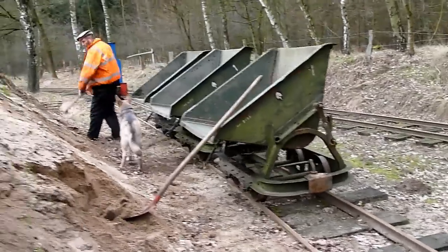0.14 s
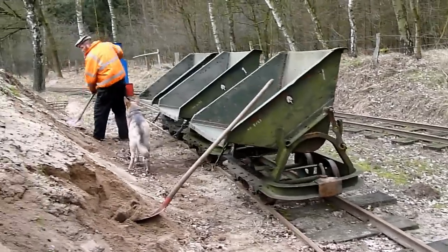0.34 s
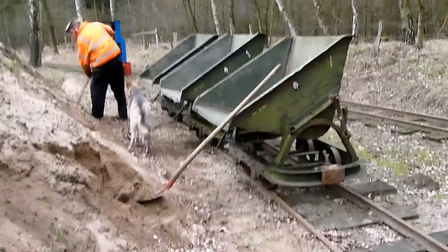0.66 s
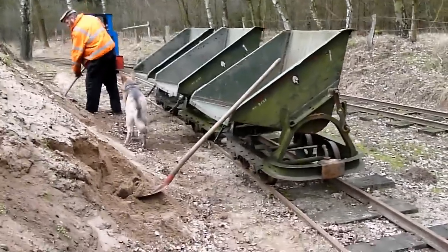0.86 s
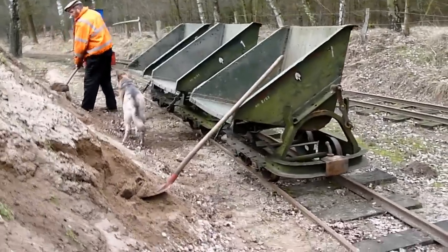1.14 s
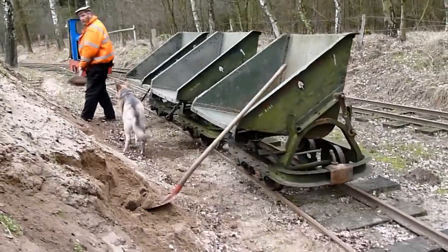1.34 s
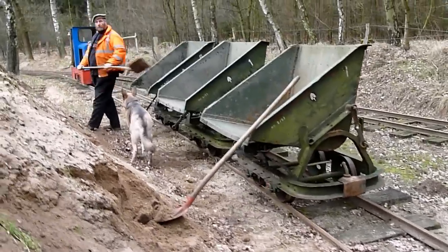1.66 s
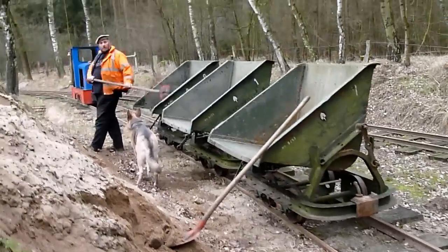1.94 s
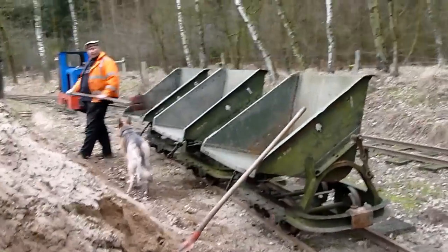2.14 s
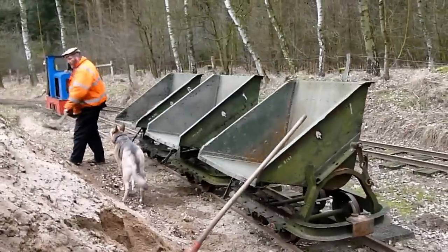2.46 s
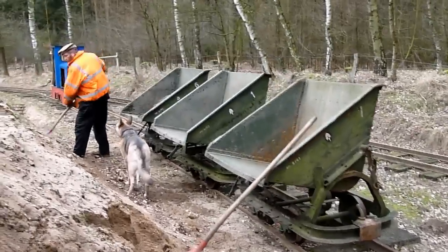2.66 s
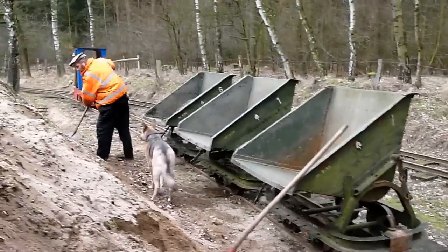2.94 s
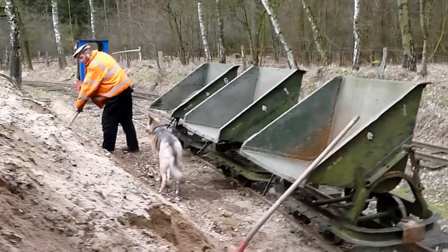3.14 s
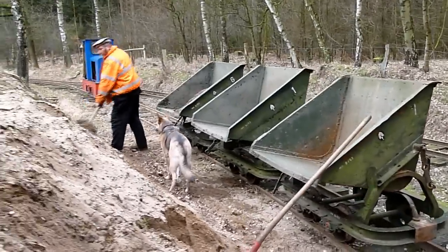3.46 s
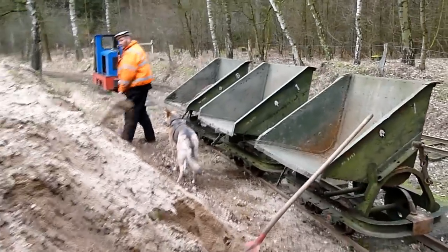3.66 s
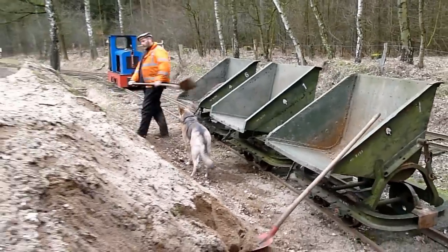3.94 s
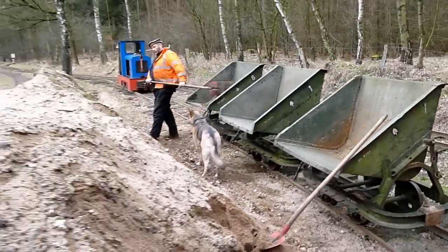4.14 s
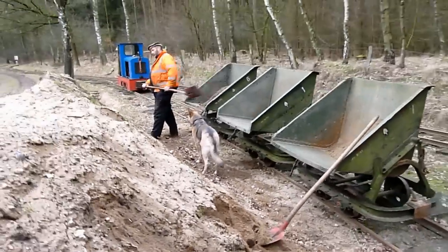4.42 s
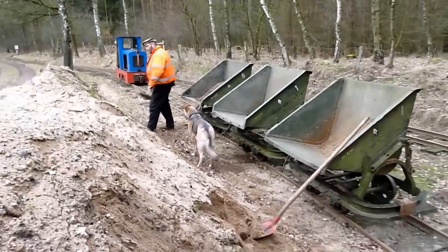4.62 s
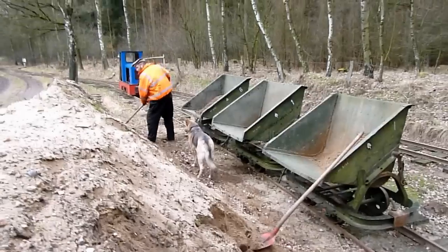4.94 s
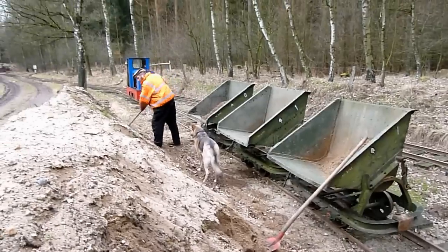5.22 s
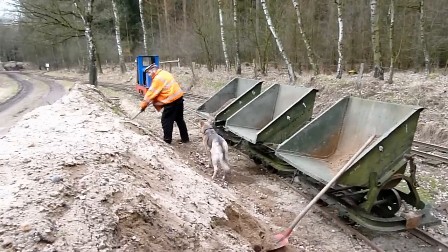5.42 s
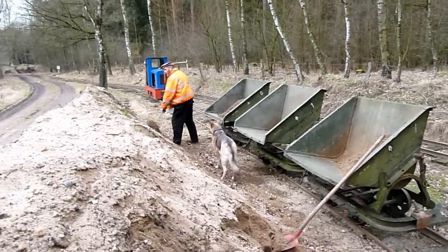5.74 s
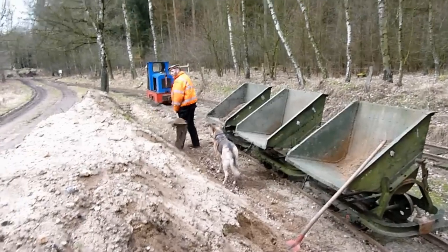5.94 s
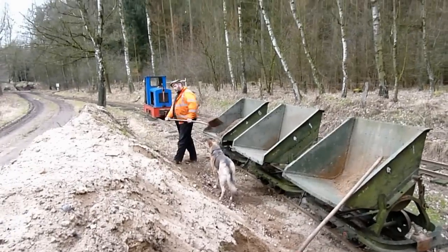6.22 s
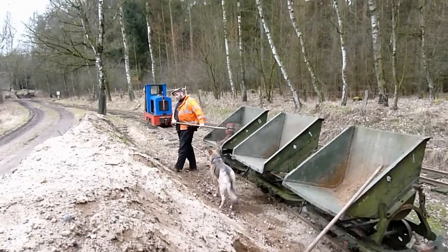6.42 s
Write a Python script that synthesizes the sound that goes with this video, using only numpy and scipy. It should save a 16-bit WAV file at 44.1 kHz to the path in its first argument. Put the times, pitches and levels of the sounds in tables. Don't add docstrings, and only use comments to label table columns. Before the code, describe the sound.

A low, soft wash of wind and far traffic runs throughout, with a faint wavering engine hum in the first 1.7 seconds. Fine sand trickles at about 0.4 s; at 0.7 s a shovel blade stabs the heap with a bright, stony clang and a rush of grit that dies as coarse grains roll on. Soft trickles, pebbles and boot thuds lead to the first load, sliding off and bursting into a steel wagon around 1.9-2.0 s. Boots scuff near 2.9 s, then the hardest stab crunches at 3.1 s. Trickling precedes a louder throw at 4.15 s, with a late shower of grains. From 4.8 to 5.1 s a tool knocks the wagon wall, its plates ringing dully and rattling. A third sharp stab comes at 5.3 s, sand hisses and trickles from 5.9 s, and a last, scrapier throw lands at 6.45 s. Blows echo faintly off trunks and wagons.

```python
import sys
import numpy as np
from scipy import signal
from scipy.io import wavfile
from scipy.ndimage import uniform_filter1d

SR = 44100
rng = np.random.default_rng(int(sys.argv[2]) if len(sys.argv) > 2 else 0)


def unload_audio(sound):
    columns = np.transpose(np.atleast_2d(sound))
    steps = np.round(np.clip(columns, -1, 1) * 32767)
    wavfile.write(sys.argv[1], SR, steps.astype(np.int16))


def volts_from_db(level):
    exponent = np.asarray(level, float) / 20
    return 10 ** exponent


N = 290178
TICKS = np.arange(0, N + 32, 32) / SR


def evened(x):
    return x / np.sqrt(np.mean(x ** 2) + 1e-20)


def read(points, hz):
    f, value = np.transpose(points)
    return np.interp(np.log(hz + 1), np.log(f + 1), value)


def follow(rows):
    s, *columns = np.transpose(rows)
    return [np.interp(np.arange(N) / SR, s, c) for c in columns]


def add(mix, s, sound):
    part = mix[..., round(s * SR):][..., :sound.shape[-1]]
    part += sound[..., :part.shape[-1]]


def play(mix, table, source, *shared):
    for s, *row in table:
        add(mix, s, source(*row, *shared))


def band(x, lo_hz, hi_hz, order=2):
    edges_hz = [lo_hz, min(hi_hz, SR / 2 - 99)]
    return signal.sosfilt(signal.butter(order, edges_hz, "band", fs=SR, output="sos"), x)


def ring(x, hz, width_hz):
    return signal.lfilter(*signal.iirpeak(hz, hz / width_hz, SR), x)


def sides(x, pan_db):
    return np.array([x * volts_from_db(pan_db / 2), x * volts_from_db(-pan_db / 2)])


def grains(per_s, spread_db):
    size = volts_from_db(spread_db * np.minimum(rng.exponential(1, (2, N)), 5))
    size = size * rng.choice([-1, 1], (2, N))
    return size * (rng.random((2, N)) < per_s / SR)


def pitched(count, lo_hz, hi_hz, cycles, per_s, spread_db):
    kind, hits = rng.integers(0, count, (2, N)), grains(per_s, spread_db)
    pitches_hz = np.geomspace(lo_hz, hi_hz, count)
    return sum(ring(hits * (kind == k), hz, hz / cycles) for k, hz in enumerate(pitches_hz))


def lobe(s, db, rise_s, fall_s):
    late = TICKS - s
    return db - 20 * np.where(late < 0, -late / max(rise_s, .002), late / max(fall_s, .002))


def blend(parts):
    columns = np.array([np.broadcast_arrays(TICKS, *p)[1:] for p in parts])
    level_db, *colours = columns.transpose(1, 0, 2)
    power = volts_from_db(level_db) ** 2
    total = power.sum(axis=0)
    mixed = [10 * np.log10(total)] + [(c * power).sum(axis=0) / total for c in colours]
    return [np.interp(np.arange(N) / SR, TICKS, m) for m in mixed]


# freq_hz, density_db_per_hz
WASH = [(18, -38), (30, -3.5), (64, -1), (183, -1), (244, 3), (371, 1.5), (535, 1.5), (1240, -4),
        (1650, -8), (4130, -10.5), (7950, -16.5), (12400, -20), (15700, -22.5)]
WASH_DB = -46.5
# freq_hz, correlation
SAME = [(60, 0.96), (150, 0.87), (380, 0.85), (950, 0.52), (2380, -1.06), (5980, -0.34), (15000, 0.11)]
# time_s, pitch_hz, level_db
HUM = [(0.0, 269, -73), (0.104, 255, -61), (1.088, 258, -62), (1.151, 245, -61.5), (1.206, 271, -93),
       (1.41, 256.4, -57.5), (1.656, 255, -64.5), (1.7, 246.1, -88)]


def wash():
    frames, hz = N // 256 + 5, np.fft.rfftfreq(1024, 1 / SR)
    a, b, c, d, patches = rng.standard_normal((frames, 513, 5)).T
    patches = uniform_filter1d(patches, size=10, axis=0)
    patches = evened(uniform_filter1d(patches, size=14, axis=1))
    same = np.clip(read(SAME, hz), -1 / 4, 1)[:, None]
    left = a + 1j * b
    z = np.array([left, same * left + np.sqrt(1 - same ** 2) * (c + 1j * d)])
    z *= volts_from_db(read(WASH, hz)[:, None] + 1.4 * patches)
    noise = signal.istft(z, nperseg=1024, noverlap=768)[1][:, :N]
    fade = (HUM[-1][0] + .3, HUM[-1][1], -90)
    hum_hz, hum_db = follow([*HUM, fade])
    hum = np.sqrt(2) * volts_from_db(hum_db) * np.sin(2 * np.pi * np.cumsum(hum_hz) / SR)
    return volts_from_db(WASH_DB - 2.5) * evened(noise) + hum


# peak_s, level_db, rise_s_per_20db, fall_s_per_20db
CRUNCHES = [(.356, -56, 0.2, 2.1), (0.719, -49, 0, 0.53), (1.85, -57.5, 2, 0.79),
            (1.977, -46.5, 0.23, 0.16), (2.29, -51.5, 0.5, 0.2), (2.86, -54.5, 0.5, 0),
            (2.975, -55.5, 1.1, -2.5), (3.102, -35.5, 0.05, 0.14), (3.35, -51.5, 0.2, 0),
            (4.15, -34.5, 0.05, -0.05), (4.185, -41, 0.12, -0.03), (4.39, -51.5, 2, -3.5),
            (4.63, -45, 0, -1.06), (5.353, -40.5, 0.1, -0.01), (5.375, -44.5, 0.1, 0.07),
            (6.451, -47, 0.22, 0.5)]
SOIL_DB = -66.5


def heft():
    near, far = pitched(count=8, lo_hz=440, hi_hz=1590, cycles=2.04, per_s=1500, spread_db=2.5)
    level_db = blend([[SOIL_DB]] + [[lobe(*row)] for row in CRUNCHES])[0]
    return volts_from_db(level_db + 0.2) * evened(np.array([near + 0.083 * far, near - 0.42 * far]))


def thud(db, hz, t60_s, click_db):
    t = np.arange(6000) / SR
    turns = hz * (t + 0.00064 * (1 - np.exp(-t / 0.00027)))
    push = -np.sin(2 * np.pi * turns) * volts_from_db(-60 * t / t60_s) * (1 - np.exp(-t * hz * 4.2))
    push = band(push, 78, 1400, order=1)
    click = rng.standard_normal(len(t)) * volts_from_db(-60 * t / 0.015) + 4.1 * (t == 0)
    click = band(click, 640, 3700, order=1)
    return volts_from_db(db) * (push / abs(push).max() + volts_from_db(click_db) * click / abs(click).max())


# start_s, peak_db, pitch_hz, t60_s
PEBBLES = [(1.5495, -35, 1179, 0.0066), (1.554, -35.5, 734, 0.014), (1.836, -36, 810, 0.014),
           (1.972, -33, 737, 0.053), (2.235, -41, 695, 0.022), (2.2525, -33, 540, 0.0098),
           (2.2735, -34, 597, 0.0082), (2.3025, -39, 900, 0.018), (2.8525, -35, 754, 0.0092),
           (2.9773, -23.5, 1130, 0.0041), (2.9778, -36, 760, 0.009), (3.0895, -26.5, 464, 0.007),
           (3.0968, -27, 604, 0.0046), (3.117, -35, 900, .012), (3.344, -41, 420, 0.053),
           (4.6597, -34, 600, 0.011), (5.254, -43.5, 414, 0.082), (5.347, -31.5, 780, 0.034),
           (5.401, -37, 353, 0.017)]
# start_s, peak_db, pitch_hz, t60_s
CLODS = [(.7095, -21, 1197, 0.031), (.71, -26.5, 205, 0.0048), (.712, -23.5, 640, 0.014),
         (1.8025, -34, 240, 0.02), (1.8085, -27, 213, 0.028), (2.59, -45, 203, 0.19),
         (2.8495, -40, 410, 0.091), (2.8525, -31.5, 247, 0.01), (2.978, -29.5, 253, 0.0086),
         (3.098, -41, 95, 0.027), (3.105, -26, 350, 0.046), (3.13, -34.5, 216, 0.048),
         (3.4445, -22, 314, 0.0074), (3.9, -44, 217, 0.13), (4.825, -33.5, 260, 0.021),
         (5.348, -33, 323, 0.0056), (6.452, -36.5, 750, 0.1)]
PEBBLE_CLICK_DB, CLOD_CLICK_DB = -9, -18


def footfalls(ground):
    play(ground, PEBBLES, thud, PEBBLE_CLICK_DB)
    play(ground, CLODS, thud, CLOD_CLICK_DB)


# freq_hz, level_db, t60_s
WAGON = [(106, -11, .25), (119, -5, .45), (138, -6, .12), (178, -4, .12), (205, -1, .2), (262, -4, .1),
         (350, -8, .12), (445, -10, .06), (526, -5, .07), (622, -1, .1), (690, -4, .06), (770, -7, .08),
         (904, -4, .08), (1060, -7, .05)]


def knock(db, spot_hz, rattle_s, rattle_db):
    t = np.arange(SR // 2) / SR
    plate = 0
    for f, mode_db, t60_s in WAGON:
        off_spot_db = 10.6 * abs(np.log2(f / spot_hz))
        plate = plate + volts_from_db(mode_db - 60 * t / t60_s - off_spot_db) * np.sin(2 * np.pi * f * t)
    shake = rng.standard_normal(2000)
    blow = shake * np.exp(-t[:2000] / max(rattle_s, .001))
    plate = plate * volts_from_db(4 * np.interp(120 * t, np.arange(2000), shake))
    rung = band(plate * (1 - np.exp(-t / max(0.24 * rattle_s, .0005))), 106, 2000)
    rattle = band(np.pad(blow, (0, len(t) - len(blow))), 510, 1130)
    return volts_from_db(db) * (rung / abs(rung).max() + volts_from_db(rattle_db) * rattle / abs(rattle).max())


# start_s, peak_db, spot_hz, rattle_s, rattle_share_db
KNOCKS = [(4.806, -38.5, 343, 0.024, 2.5), (4.822, -39, 230, 0.0021, -29), (4.8842, -26, 650, 0.0019, -3),
          (4.8845, -34.5, 970, .006, 1), (4.8846, -29, 133, 0.0062, -12), (4.897, -29.5, 210, 0.021, -3),
          (4.928, -31.5, 197, 0.017, -4), (4.977, -36.5, 674, 0.0051, -6), (4.991, -35.5, 616, 0.0045, 0.5),
          (5.122, -40.5, 910, 0.02, -6), (5.132, -47, 119, .01, -17)]


def wagon_knocks(ground):
    play(ground, KNOCKS, knock)


def lump(db, hz, t60_s, ring_db, rise_s, pan_db):
    t = np.arange(4000) / SR
    width_hz = 300
    grit, shake, other = rng.standard_normal((3, len(t)))
    shape = volts_from_db(-60 * t / t60_s) * (1 - np.exp(-t / max(rise_s, 1e-4)))
    grit = band(grit * shape, 1670, 7200)
    rings = ring(ring(shake, hz, width_hz), hz, width_hz)
    rings = rings / uniform_filter1d(rings ** 2, size=160) ** .25
    rings = evened(rings[1000:]) * shape[:-1000] ** 0.7 / shape.max() ** 0.56
    rings = volts_from_db(ring_db - 5) * np.pad(rings, (0, 1000))
    scattered = 0.27 * band(other * shape, 3000, 8000, order=1) * [[1], [-1]]
    return sides(volts_from_db(db), pan_db)[:, None] * ((grit + scattered) / abs(grit).max() + rings)


# start_s, peak_db, ring_hz, t60_s, ring_share_db
CHIPS = [(1.5495, -44, 2300, .008, -1), (1.554, -43, 3500, .008, -4), (2.8652, -37, 2780, 0.0054, -3),
         (2.9772, -42, 2010, 0.01, -11), (4.6597, -47, 1990, .012, -4), (4.8108, -42, 1800, 0.023, -3),
         (4.815, -40, 3900, 0.027, -8), (4.825, -42, 2300, .02, -4), (4.8836, -31.5, 3400, 0.031, -1),
         (4.884, -39, 6400, .03, -3), (4.8896, -31, 2700, 0.03, 0), (4.899, -39.5, 2200, 0.018, 4),
         (4.928, -36.5, 3850, 0.035, -5), (4.933, -40.5, 5700, 0.023, -3), (4.943, -39, 2000, 0.022, 1),
         (4.978, -40, 2920, 0.033, -6), (4.993, -38, 2700, 0.04, -12), (3.286, -40, 3340, .012, 1.5),
         (5.336, -30, 3020, 0.055, 0), (5.402, -32, 2800, 0.045, -8), (5.1256, -42, 6400, .04, 0.5),
         (5.127, -43, 2560, .04, -2), (5.2584, -44.5, 5660, 0.016, 4)]
CHIP_RISE_S, CHIP_PAN_DB = 0.0011, -1.5
# start_s, peak_db, ring_hz, t60_s, ring_share_db
LUMPS = [(1.865, -40.5, 4150, 0.036, -4), (1.877, -32, 4900, 0.032, -5), (1.886, -31, 3160, 0.035, -5),
         (1.895, -33, 4600, 0.054, -2), (1.912, -39, 4040, .03, -4), (1.915, -38, 2350, .06, -5),
         (1.938, -35, 3240, 0.046, -7), (1.955, -24, 3400, 0.034, -7), (1.967, -23, 3160, 0.04, -9),
         (1.972, -26, 2000, 0.035, -4.5), (1.976, -25, 4260, 0.03, -6), (1.983, -29, 3330, 0.03, -9),
         (4.117, -31, 2200, 0.055, -4), (4.127, -28, 2930, 0.044, -4), (4.134, -30, 3700, .03, -9),
         (4.144, -25.5, 5800, .02, -6), (4.144, -30, 1890, 0.093, -1), (4.15, -27, 2330, 0.045, -0.5),
         (4.167, -32, 1950, 0.05, 1.5), (4.17, -37, 2280, 0.044, -1), (4.185, -29, 4300, 0.04, -9),
         (4.187, -32.5, 6560, 0.027, -4), (4.198, -39, 2370, .03, 1), (4.226, -32.5, 5030, .03, -8),
         (6.1944, -33.5, 2360, 0.0088, -13), (6.2994, -47, 6260, 0.011, 6), (6.311, -43, 5400, 0.036, 0),
         (6.424, -32.5, 4450, .05, -1.5), (6.428, -34, 2120, .05, -3), (6.435, -35, 3040, .03, -3),
         (6.451, -30, 2270, 0.027, 1), (6.4565, -26.5, 2420, 0.02, 3.5), (6.4565, -31, 3800, 0.02, 3),
         (6.468, -30, 2600, 0.025, -12), (6.505, -32, 3300, 0.063, -4), (6.507, -35, 2300, 0.03, 1),
         (6.516, -36, 3430, 0.036, 1), (6.525, -43, 3480, 0.047, 2), (6.565, -44, 3500, .04, 0)]
LUMP_RISE_S, LUMP_PAN_DB = 0.0057, -1.5


def crumbling(blows):
    play(blows, CHIPS, lump, CHIP_RISE_S, CHIP_PAN_DB)
    play(blows, LUMPS, lump, LUMP_RISE_S, LUMP_PAN_DB)


# peak_s, level_db, rise_s_per_20db, fall_s_per_20db, steel_over_grit_db
SCUFFS = [(1.1, -65, 0.1, 1.5, 18), (2.43, -57, 1, .1, -9), (2.88, -56.5, 0.1, 0, 7),
          (3.001, -56, 0.08, 0, 8.5), (3.3, -60, 0.6, 0.7, 11), (4.112, -50.5, 0.3, 0.35, 12),
          (4.215, -52, 0.3, 0.38, -2), (4.52, -68, 3, 0, -7), (4.886, -59, 0.26, 0.48, 6),
          (4.995, -58, -0.2, 0.44, 0), (3.56, -61.5, 0.5, -33, 7), (5.258, -60.5, 0.3, 2, -3),
          (5.7, -62.5, -1, 5, -4), (6.519, -48.5, 0.06, 0.06, 7), (6.57, -48, -0.05, -14, 3),
          (6.0, -58.5, 0, 0, 29)]
SCUFF_DUST_DB, SCUFF_PAN_DB, SCUFF_SCATTER_DB = -6, -2.5, 2.5


def scuff_motions():
    for s, db, rise_s, fall_s, steel_db in SCUFFS:
        yield lobe(s, db, rise_s, fall_s), steel_db, SCUFF_DUST_DB, SCUFF_PAN_DB, SCUFF_SCATTER_DB


# peak_s, level_db, rise_s_per_20db, fall_s_per_20db, fineness_db
TRICKLES = [(.372, -51, -0.52, 0.27, 6.5), (.45, -59, -0.5, 0.1, 5), (1.33, -57.5, 0, 0, -4),
            (1.48, -55.5, 0.84, -0.05, 2), (1.67, -62, 1, 0, 13), (1.8, -55.5, -1.3, 0.3, -2),
            (2.09, -51, -0.34, 0.14, 3), (2.27, -55.5, .1, -0.14, 13), (2.7, -57, 0.4, 0.5, 6.5),
            (3.51, -54.5, -1, 0.25, 6.5), (3.68, -59.5, 0, 2.5, -5), (4.82, -56, 0, -0.7, 6),
            (4.935, -50.5, -0.34, 0.13, 4.5), (3.83, -51, 0.2, 0.73, 7.5), (4.0, -50, -0.16, 0.64, 12.5),
            (4.32, -55, 0.8, 0.2, 7), (5.133, -53.5, 0, 0, -4), (5.92, -52.5, 0.15, .5, 3),
            (6.06, -51.5, 0.14, 10, 2.5), (6.19, -48, -0.12, .5, 12), (6.31, -46.5, -0.05, .5, 9.5)]
REST_DB = -80
DUST_PER_FINENESS, TRICKLE_SCATTER_DB = 0.41, -10.5


def trickle_motions():
    yield REST_DB, 0, 0, 0, TRICKLE_SCATTER_DB
    slowest_s = .06
    for s, db, rise_s, fall_s, fine_db in TRICKLES:
        level_db = lobe(s, db, max(rise_s, slowest_s), max(fall_s, slowest_s))
        yield level_db, -fine_db, DUST_PER_FINENESS * fine_db, .4, TRICKLE_SCATTER_DB


# leaves_s, leave_db, lands_s, land_db, steel_over_grit_db
THROWS = [
    (1.901, -37, 1.98, -37, 0),
    (4.139, -35, 4.19, -34, 0),
    (6.434, -37.5, 6.466, -39, 4),
]
THROW_DUST_DB, THROW_SCATTER_DB = -1, -9.5
THROW_RISE, THROW_FALL, LAND_RISE = 0.8, 2.9, 0.61
LAND_FALL_S = 0.044
SHOWER_DB, SHOWER_FALL_S = -14, 0.36


def throw_motions():
    for leaves, leave_db, lands, land_db, steel_db in THROWS:
        flight = lands - leaves
        slide = lobe(leaves, leave_db, THROW_RISE * flight, THROW_FALL * flight)
        slide = np.where(TICKS < lands, slide, -99)
        yield slide, steel_db - 0.5, THROW_DUST_DB, 0, THROW_SCATTER_DB
        landing = lobe(lands, land_db, LAND_RISE * flight, LAND_FALL_S)
        yield landing, steel_db, THROW_DUST_DB, 0, THROW_SCATTER_DB
        shower = lobe(lands + 0.039, land_db + SHOWER_DB, LAND_FALL_S, SHOWER_FALL_S)
        yield shower, 0, 2.2, 0, TRICKLE_SCATTER_DB


# enters_s, full_depth_s, grit_db, fall_s_per_20db, steel_over_grit_db
STABS = [
    (0.69, 0.748, -30, 0.14, -2.5),
    (3.067, 3.09, -26, 0.1274, -2.5),
    (5.31, 5.334, -30, 0.16, -3.5),
]
STAB_DUST_DB, DUST_SETTLES_DB_PER_S = -1, 45
STAB_PAN_DB, SLIDE_PAN_DB_PER_S = 1, 27
STAB_SCATTER_DB, SCATTER_GROWS_DB_PER_S, SCATTER_MAX_DB = -6, 60, -2.5
SETTLE_DB, SETTLE_FALL_S, SETTLE_STEEL_DB, SETTLE_DUST_DB = -17, 0.29, 4.5, -16


def stab_motions():
    for enters, s, db, fall_s, steel_db in STABS:
        depth = np.clip((TICKS - enters) / (s - enters), 1e-3, 1)
        since = np.clip(TICKS - s, 0, .3)
        level_db = db + 15 * np.log10(depth) - 20 * np.maximum(TICKS - s, 0) / fall_s
        dust_db = STAB_DUST_DB - DUST_SETTLES_DB_PER_S * since
        pan_db = STAB_PAN_DB - SLIDE_PAN_DB_PER_S * since
        scatter_db = np.minimum(STAB_SCATTER_DB + SCATTER_GROWS_DB_PER_S * since, SCATTER_MAX_DB)
        yield level_db, steel_db, dust_db, pan_db, scatter_db
        settling = lobe(s + 0.0063, db + SETTLE_DB, 0.046, SETTLE_FALL_S)
        yield settling, SETTLE_STEEL_DB, SETTLE_DUST_DB, -1.5, -3


# freq_hz, density_db_per_hz
GRIT = [(900, -70), (1500, -10), (2100, -1.5), (4200, 0), (6500, -0.5), (10000, -0.5), (13000, -0.5),
        (15700, -4.5)]
# freq_hz, width_hz, level_db
BLADE = [(2350, 150, 0), (3060, 110, 0), (3500, 90, -1), (4230, 120, -1), (5750, 120, -4), (6650, 90, -4),
         (8000, 200, -2)]


def sand():
    motions = [*scuff_motions(), *trickle_motions(), *throw_motions(), *stab_motions()]
    grit_db, steel_db, dust_db, pan_db, scatter_db = blend(motions)
    coarse = pitched(count=24, lo_hz=1730, hi_hz=14800, cycles=5.8, per_s=1500, spread_db=-1.0)
    hits = evened(grains(per_s=20000, spread_db=1.5)) + .6 * evened(coarse)
    hits = hits + 0.5 * sum(volts_from_db(db) * ring(hits, f, w) for f, w, db in BLADE)
    hits = hits / np.std(band(hits, 4500, 9000, order=4))
    hz, t, z = signal.stft(hits, SR, nperseg=128, noverlap=96)
    at = np.minimum(t * SR, N - 1).astype(int)
    low = read([(3200, 1), (6200, 0)], hz)[:, None]
    high = read([(6800, 0), (12000, 1)], hz)[:, None]
    z *= volts_from_db(read(GRIT, hz)[:, None] + low * (steel_db[at] + 1.0) + high * (dust_db[at] - 1.0))
    patches = uniform_filter1d(rng.standard_normal(z.shape[1:]), size=2, axis=0)
    patches = uniform_filter1d(patches, size=45, axis=1)
    z *= volts_from_db(1.2 * evened(patches))
    z[1] *= volts_from_db(scatter_db[at] - 4.4 * low + 0.3 * high)
    direct, scattered = signal.istft(z, SR, nperseg=128, noverlap=96)[1][:, :N]
    clumps = volts_from_db(1.0 * evened(uniform_filter1d(rng.standard_normal(N), size=300)))
    level = sides(volts_from_db(grit_db - 0.3) * clumps, pan_db)
    return level * np.array([direct + scattered, direct - scattered])


def strike(db, hz, t60_s, ring_db, pan_db):
    t = np.arange(6000) / SR
    shape = volts_from_db(-60 * t / t60_s) * (1 - np.exp(-t / (.03 * t60_s)))
    crack, other = rng.standard_normal((2, len(t))) * shape
    tick = .025 / t60_s * (t == 0)
    crack = band(crack + tick, max(2200, .4 * hz), min(5000 + .8 * hz, 17000))
    rings = np.sin(2 * np.pi * hz * t) * volts_from_db(ring_db - 45 * t / t60_s) * (1 - np.exp(-t / .0006))
    scattered = 0.54 * band(other, 6700, 12000, order=1) * [[1], [-1]]
    return sides(volts_from_db(db), pan_db)[:, None] * ((crack + scattered) / abs(crack).max() + rings)


# start_s, peak_db, ring_hz, t60_s, ring_share_db
STONES = [(.7098, -11, 12600, 0.014, -4), (.7102, -13.5, 10900, 0.01, 1), (.7112, -11.5, 3120, 0.022, -4),
          (.7125, -14, 4300, 0.013, -3), (.7105, -17, 8100, 0.021, -1), (.7168, -23, 2480, 0.017, -10),
          (.7153, -15.5, 2430, 0.026, -2.5), (3.0803, -9.5, 6130, 0.0061, -6),
          (3.0902, -8.5, 7870, 0.0095, -2), (3.0904, -11, 2650, .008, -3), (3.0912, -7.5, 4440, 0.0081, -7),
          (3.0972, -12, 14000, 0.0067, -7), (3.0995, -9.5, 7700, 0.011, -5), (3.1064, -20, 3420, 0.023, 2),
          (3.1184, -15.5, 3370, 0.023, -10), (3.3118, -26, 7800, 0.006, -10),
          (3.3118, -35, 14200, .005, -7), (3.3123, -27, 3500, 0.0057, -3), (3.4438, -33, 13000, 0.0081, -8),
          (5.3195, -20, 9520, 0.012, 3.5), (5.3218, -8.5, 4160, 0.013, 2.5), (5.3215, -11, 8390, 0.0087, 6),
          (5.322, -12.5, 5590, 0.006, 4), (5.3222, -17.5, 2760, 0.012, 4), (5.3216, -15, 12600, .012, -2),
          (5.3218, -24, 6700, 0.0066, -2), (5.3324, -24, 7130, 0.014, 2), (5.3474, -20, 7650, 0.024, -8),
          (5.362, -25, 4700, .01, 5)]
STONE_PAN_DB = 0.5


def stones(blows):
    play(blows, STONES, strike, STONE_PAN_DB)


def woods(x):
    n = SR // 2
    at = np.arange(300, n - 20, 20)
    at = at + rng.integers(0, 20, (2, len(at)))
    taps = np.zeros((2, n))
    np.put_along_axis(taps, at, rng.choice([-1., 1.], at.shape), 1)
    tail = band(taps * volts_from_db(-60 * np.arange(n) / SR / 1.04), 280, 7100, order=1)
    return signal.fftconvolve(x, tail / np.linalg.norm(tail[0]), axes=1)[:, :N]


GROUND_PAN_DB, ECHO_DB = -.7, -20


def scene():
    bed = wash() + heft() + sand()
    ground, blows = np.zeros(N), np.zeros((2, N))
    footfalls(ground)
    wagon_knocks(ground)
    crumbling(blows)
    stones(blows)
    blows = blows + sides(ground, GROUND_PAN_DB)
    return blows + volts_from_db(ECHO_DB) * woods(blows) + bed


def roll_off(x):
    return signal.sosfilt(signal.butter(12, 16990, fs=SR, output="sos"), x)


EDGE_HZ = 15900


def record(dry):
    lowpass = signal.firwin(511, EDGE_HZ, window=("kaiser", 9), fs=SR)
    limited = signal.oaconvolve(dry, lowpass[None], "same")
    return roll_off(limited)


dry = scene()
out = record(dry)
unload_audio(out)
```